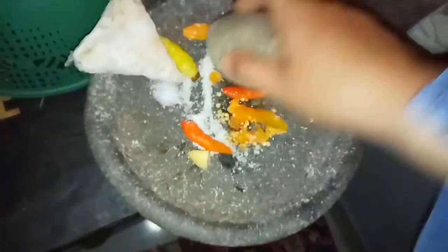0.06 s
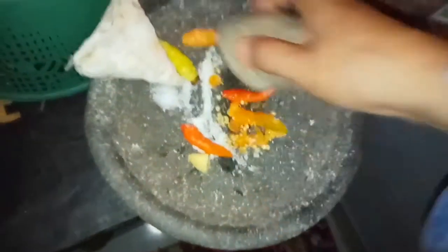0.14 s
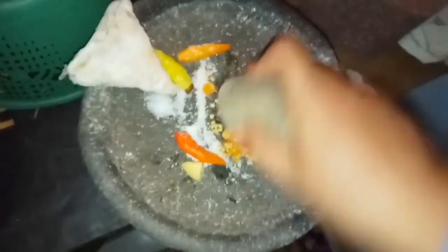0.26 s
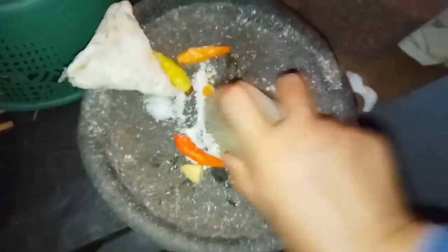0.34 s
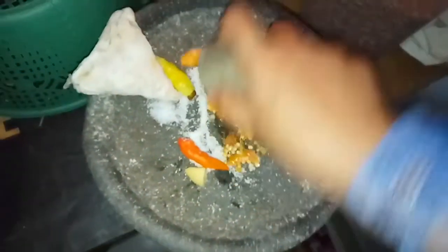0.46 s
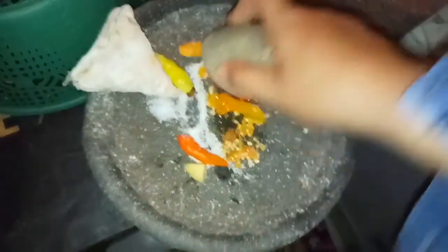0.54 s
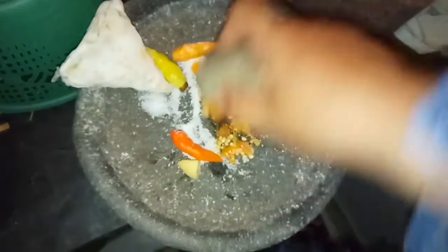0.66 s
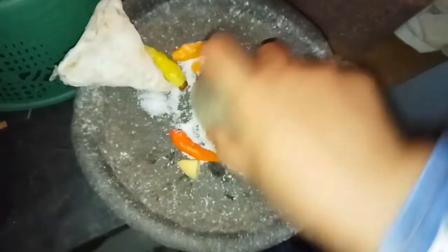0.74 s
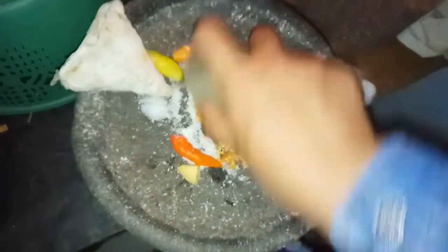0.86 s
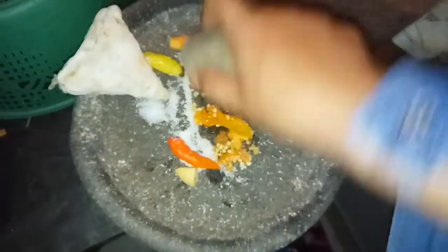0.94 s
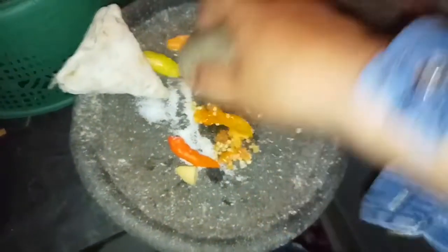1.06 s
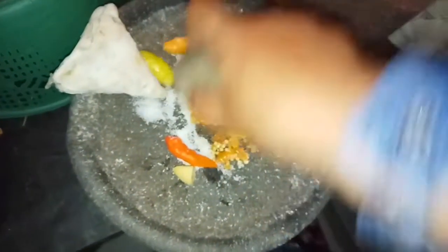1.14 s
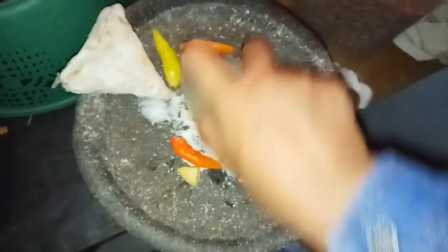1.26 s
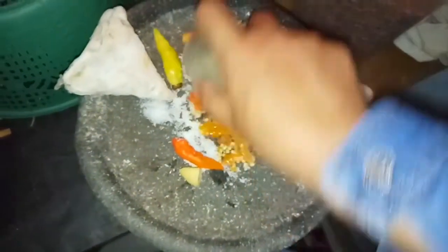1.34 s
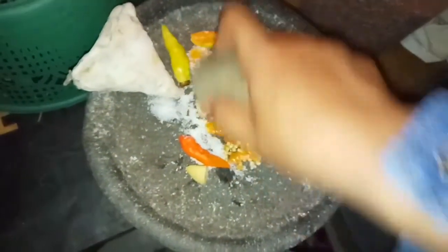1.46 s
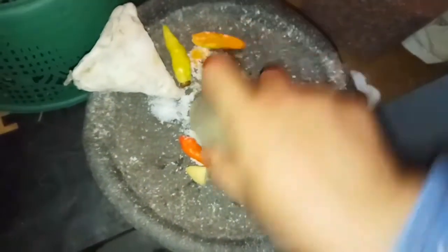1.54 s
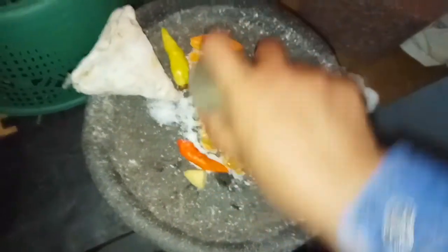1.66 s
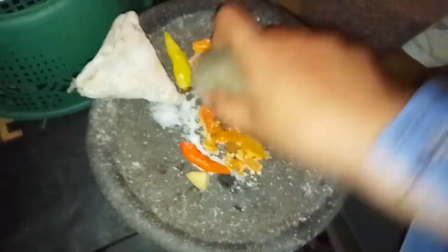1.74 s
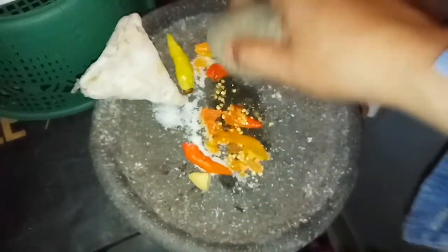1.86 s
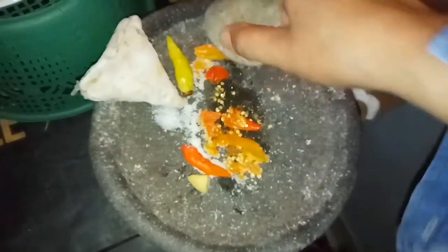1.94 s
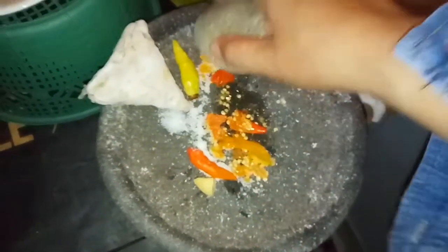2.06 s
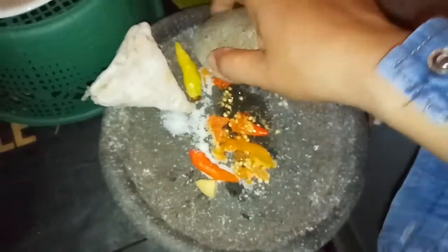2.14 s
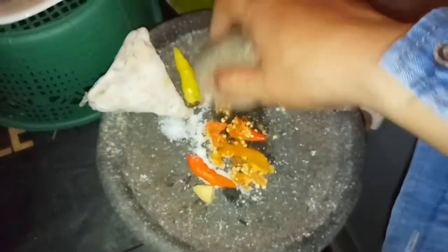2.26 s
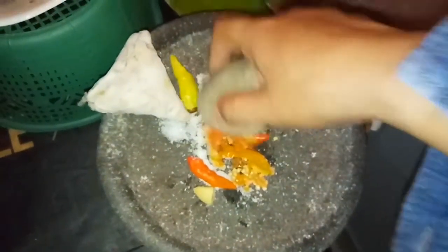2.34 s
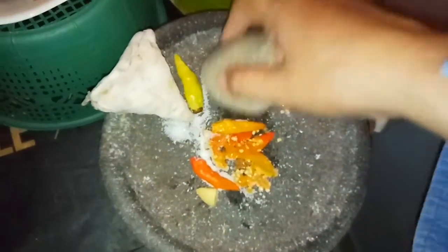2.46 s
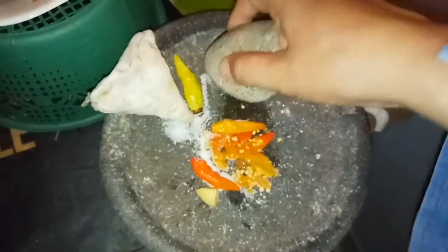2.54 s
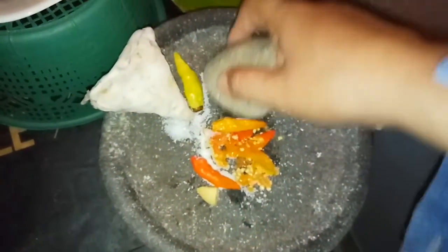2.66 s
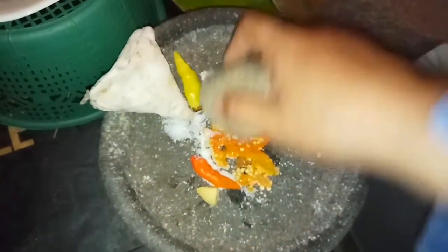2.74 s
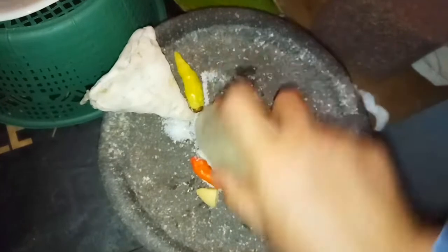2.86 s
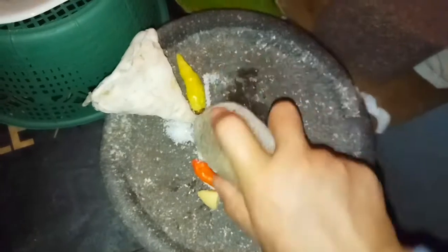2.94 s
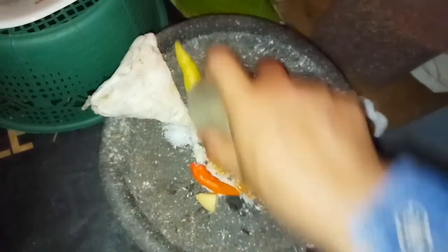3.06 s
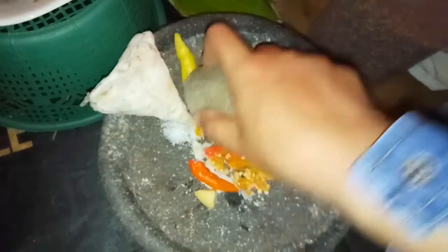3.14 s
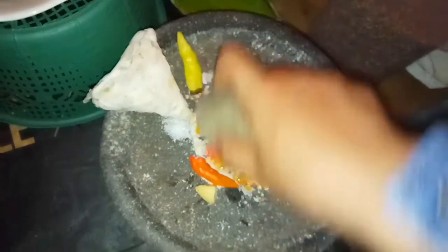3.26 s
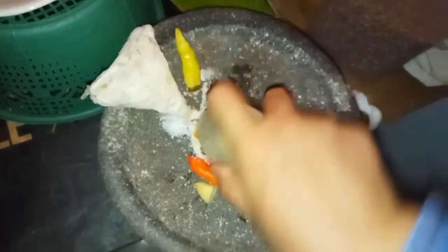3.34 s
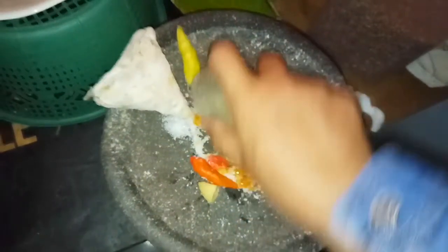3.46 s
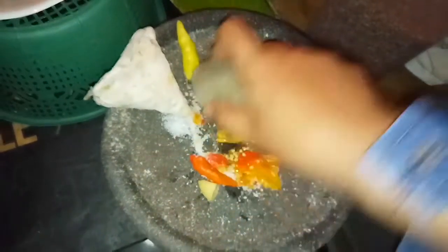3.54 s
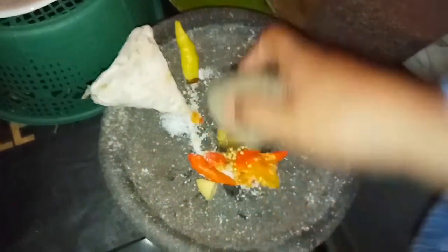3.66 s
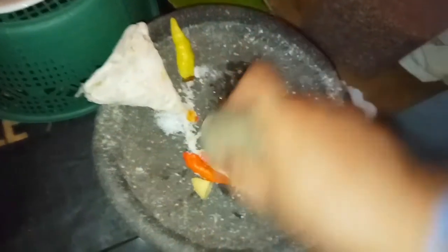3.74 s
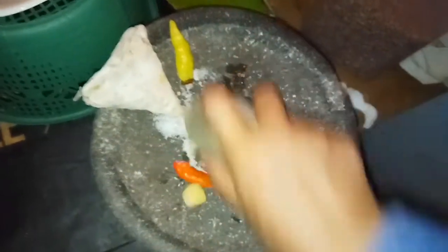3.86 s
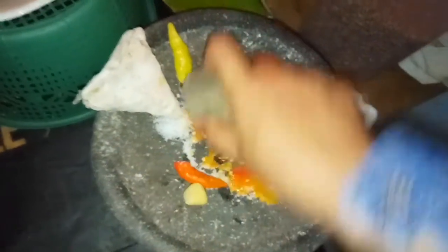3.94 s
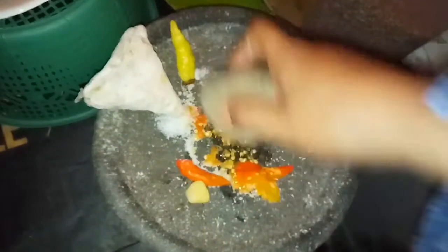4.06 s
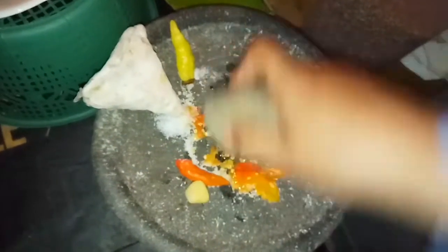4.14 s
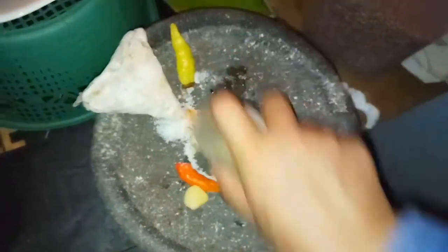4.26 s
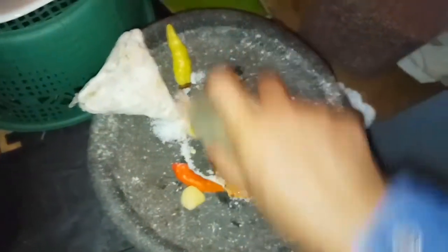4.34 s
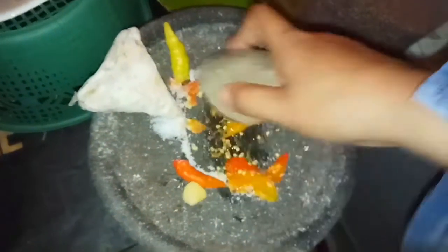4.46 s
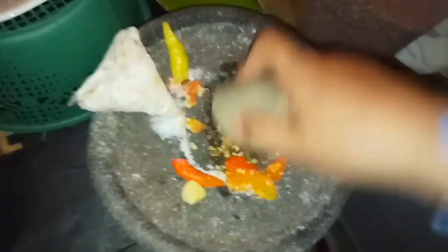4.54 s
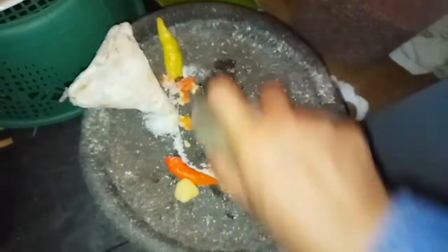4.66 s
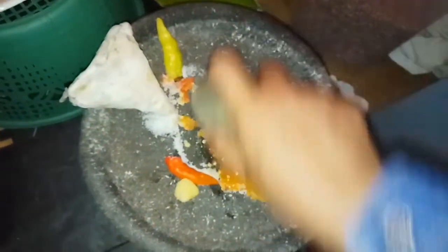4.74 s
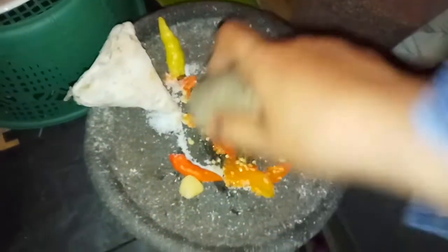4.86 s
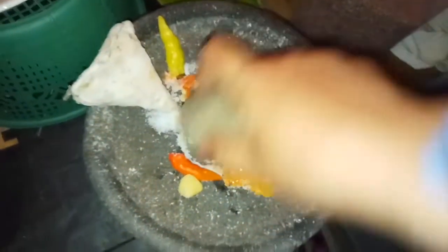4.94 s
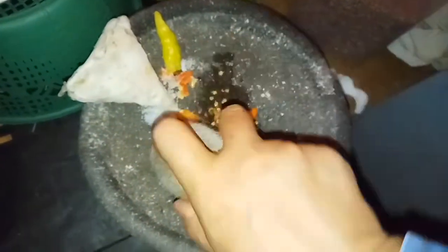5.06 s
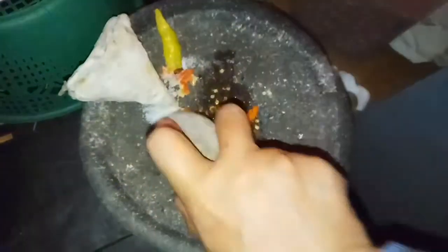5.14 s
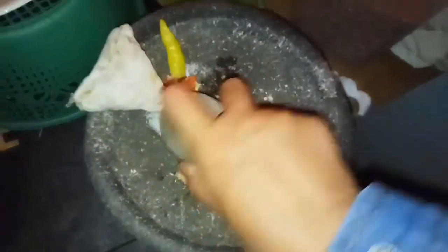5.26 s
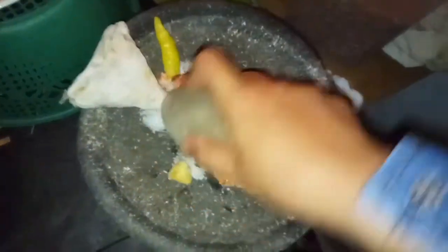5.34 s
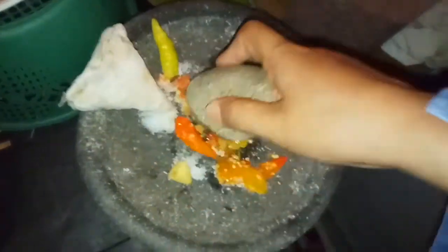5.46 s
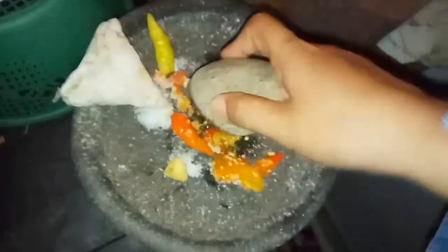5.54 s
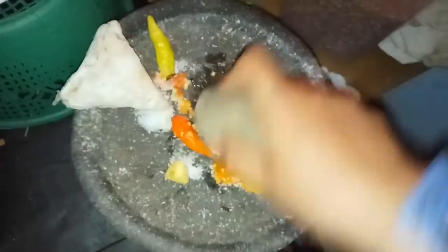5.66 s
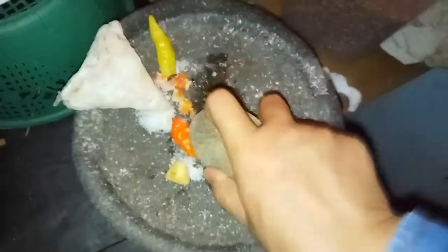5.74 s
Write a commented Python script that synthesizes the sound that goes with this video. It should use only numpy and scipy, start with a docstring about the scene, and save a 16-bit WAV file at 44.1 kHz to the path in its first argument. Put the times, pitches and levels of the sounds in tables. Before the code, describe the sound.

A close, mono, mostly dry sound in a small kitchen, with very quiet low air of the house beneath. At once a stone pestle grinds salt and chillies on a flat stone mortar. From 0 to 1.7 s short uneven strokes follow each other several times a second: bright, sandy crunches, sharp crystal snaps thickest near 0.3 s, dull hollow stone rumbles, a harder knock at 0.5 s, soft low table thuds. A pause follows, with two very faint bird chirps at 1.8 and 2.0 s; strokes return at 2.1 to 2.4 s, and a clearer falling chirp comes at 2.5 s. From 2.8 s grinding resumes, crackling strongly at 3.0 s, then in spaced strokes. Around 4.1 s bare stone rubs and knocks in a cluster, again at 4.5 s. At 5.25 s comes the heaviest crunch, with a loud snap and table thud. Sparse, small gritty strokes end near 5.8 s.

```python
"""A phone lies close to a flat stone mortar in a kitchen, over the near-steady air of the house.
At once a stone pestle sets to grinding salt and chillies, stroke after stroke to the end: crystals
crackle as bursts of coloured noise, bare stone rumbles and rings through resonant modes of the
mortar, and the table thuds under many of the pushes. Before the middle a small bird further off
chirps three times, as falling sine whistles. The room answers both mortar and bird."""
import sys
import numpy as np
from scipy import signal
from scipy.fft import rfft, irfft, next_fast_len
from scipy.io import wavfile
from scipy.ndimage import uniform_filter1d, map_coordinates

SR = 44100
rng = np.random.default_rng(int(sys.argv[2]) if len(sys.argv) > 2 else 0)


def wav_out(sig):
    """Save sig, one row per channel (or a flat mono array), as 16-bit PCM at SR to the path in sys.argv[1]."""
    wavfile.write(sys.argv[1], SR, np.round(np.clip(np.atleast_2d(sig).T, -1, 1) * 32767).astype(np.int16))


N = 255780

# Strokes that crush crystals. Each row: start in seconds, length in seconds, level of the fine grit
# at the start in dB and at the end in dB, coarse grit and finest dust in dB relative to the fine.
CRUSH_STROKES = [(0.003, 0.018, -32.5, -44, -10.5, -2.5), (0.147, 0.06, -55, -57, 8.5, 1),
                 (0.247, 0.017, -42, -34, -2, -8.5), (0.329, 0.108, -41.5, -27, -10, -3.5),
                 (0.552, 0.32, -60, -56.5, 3, 0.5), (0.7, 0.029, -32.5, -33, -12, -5.5),
                 (0.825, 0.091, -36, -33, -13.0, -3.5), (0.955, 0.025, -63.5, -48.5, -2.5, -2),
                 (1.071, 0.087, -56, -37.5, -12.5, -1), (1.283, 0.089, -29.0, -36.5, -12, -2),
                 (1.47, 0.039, -35, -54, -9, -1.5), (1.523, 0.02, -35.5, -34, -13.5, 1.5),
                 (1.634, 0.051, -31, -31, -13.5, -2), (2.144, 0.024, -46, -55, -3, -5),
                 (2.229, 0.1, -38, -27, -5, -1.5), (2.793, 0.1, -47.5, -58.5, 5.5, -2),
                 (2.897, 0.043, -52.5, -42.5, -9.5, -0.5), (2.975, 0.13, -39.5, -36.5, -9, 0),
                 (3.228, 0.096, -52, -40.5, 0.5, 0), (3.427, 0.03, -37.5, -32.5, -8, -2.5),
                 (3.597, 0.07, -67, -59.5, 5.5, 4), (3.709, 0.053, -48, -46, -2.5, -5),
                 (3.817, 0.09, -31.5, -34.5, -7.5, -3.5), (3.907, 0.03, -56.0, -34.5, -11.0, -2.5),
                 (4.09, 0.12, -50.5, -47, -2.5, -0.5), (4.213, 0.16, -57.5, -31.5, -11, -3.5),
                 (4.496, 0.13, -45.5, -37, -8.5, -4), (4.697, 0.008, -33.5, -30.5, -14.5, -6.5),
                 (4.761, 0.034, -29, -42, -10.5, 0), (4.864, 0.035, -45.5, -60, -1.5, -13),
                 (5.077, 0.025, -55, -55, -4, 2), (5.16, 0.053, -75, -52.5, 6, 5),
                 (5.249, 0.079, -25, -56.5, -7.5, -3.5), (5.324, 0.088, -46, -51, -5, -0.5),
                 (5.687, 0.007, -49, -51.5, -9.5, 0.5), (5.778, 0.0051, -33, -41, -12.5, -2.5)]
# Single crystals that snap at set moments, loud and faint. Each row: time in seconds, peak of the
# bright part in dB, peak of the dull part in dB relative to it.
SET_SNAPS = [(0.1019, -35, -17.5), (0.2334, -28, -19.5), (0.2584, -34, -16), (0.2778, -19, -18),
             (0.3027, -16.5, -22), (0.3226, -11, -11.5), (0.3338, -9.5, -18.5), (0.5769, -37.5, -18),
             (0.7184, -18, -20), (0.7794, -37, -22), (0.846, -22, -16), (0.8854, -17, -16.5),
             (0.9467, -14, -10.5), (1.1987, -24, -13), (1.283, -17, -17.5), (1.5135, -19, -23.5),
             (1.6127, -26, -19), (1.6453, -21, -15), (1.6811, -19.5, -22.5), (2.1339, -27, -5.5),
             (2.227, -20.5, -15), (2.2812, -14, -5), (2.3017, -18, -21), (2.3589, -18, -8.5),
             (2.7984, -22, -15), (2.825, -36, -17), (2.8575, -36, -12.5), (2.8948, -30, -25),
             (2.9305, -22, -10.5), (2.9696, -21, -13.5), (3.0087, -8, -13.5), (3.0199, -11, -13.5),
             (3.0854, -33, -6), (3.1113, -17.5, -10), (3.4245, -15.5, -23), (3.7044, -29.5, -4),
             (3.7594, -22, -29), (3.7803, -23.5, -16), (3.8429, -17.5, -4.5), (4.2188, -21, -24),
             (4.2398, -18, -26), (4.357, -12, -13.5), (4.607, -38, -29), (4.6466, -21, -17),
             (4.6939, -23.5, -23), (4.7371, -20, -11), (4.8633, -25, -24.5), (5.0664, -20, -13.5),
             (5.2577, -7, -13.5), (5.682, -21.5, -19), (5.7678, -26.5, -3)]
# Colours of fine grit, finest dust and coarse grit. Each row: frequency in Hz, relative gain in dB.
FINE_COLOUR = [(2500, -36), (3500, -11.5), (4300, -9.5), (5200, -2.5), (5920, -0.5), (6790, -0.5),
               (7600, -4), (8400, -20.5), (11000, -36.5)]
DUST_COLOUR = [(6000, -27), (7800, -11.5), (8800, 0.5), (9500, -0.5), (11000, -7), (12100, -12.5),
               (14800, -14), (15700, -17.5), (16100, -48)]
COARSE_COLOUR = [(300, -16), (800, -11), (1500, -1.5), (2500, 5), (3500, 4), (4500, -15), (7000, -40)]
# Strokes of stone sliding on stone. Each row: start in seconds, length in seconds, rumble at the
# start in dB and at the end in dB, hardness of the contact (ringing over rumble) in dB.
SLIDE_STROKES = [(0.039, 0.046, -34, -40, -14.0), (0.156, 0.092, -34.0, -35, -8.0),
                 (0.399, 0.077, -36.5, -70, -3), (0.52, 0.035, -31.5, -44, -16),
                 (0.612, 0.068, -35.0, -27.5, -14), (0.795, 0.16, -63.5, -40, -6),
                 (1.098, 0.0077, -42, -36.5, -8), (1.108, 0.0085, -27, -37.5, -18),
                 (1.278, 0.071, -53.5, -45.5, 1.5), (1.426, 0.038, -32.5, -28.0, -15),
                 (1.566, 0.14, -59, -46, -9.5), (1.789, 0.007, -59.5, -51, -9.5),
                 (2.135, 0.0082, -60.5, -72.5, -2.0), (2.255, 0.096, -46, -46, -4.5),
                 (2.786, 0.15, -61.5, -66.5, -0.5), (2.972, 0.112, -58.5, -60, 2.5),
                 (3.118, 0.042, -45, -57.5, -3.5), (3.226, 0.068, -44, -35, -5.5),
                 (3.456, 0.033, -38.5, -33.5, -7), (3.607, 0.16, -48, -63, -2.0),
                 (3.841, 0.053, -36, -46, -5), (3.94, 0.0051, -49.5, -37, -2.0),
                 (4.087, 0.071, -32.5, -34, -8.0), (4.243, 0.208, -50.5, -55.5, -4.5),
                 (4.497, 0.045, -29.5, -28, -9.5), (4.647, 0.14, -64, -47, -2.0),
                 (4.838, 0.033, -81, -48.5, 1.5), (5.069, 0.027, -63.5, -59, 5),
                 (5.236, 0.074, -40.5, -32.5, -10), (5.361, 0.07, -68, -59.5, 1),
                 (5.684, 0.0274, -65.5, -61, -0.5), (5.777, 0.019, -62, -65, 9)]
# The pestle knocks the bowl. Each row: time in seconds, blow in dB before the gains of the two
# sets of modes, hardness (blow to the high modes over the blow to the low) in dB.
BOWL_KNOCKS = [(0.028, -13, 15), (0.1618, -30, 0), (0.194, -20.5, 2.5), (0.2083, -28, 9.5),
               (0.511, -9.5, 3.5), (0.609, -26, 1), (0.6443, -18.5, -3), (1.0868, -23, -6),
               (1.1071, -18.5, -14), (1.4545, -14.5, -18), (1.4719, -22.5, -8), (1.795, -39, -16),
               (2.267, -28, -5.5), (3.6403, -31, -1), (3.8431, -19.5, -7), (4.0969, -19.5, -14),
               (4.105, -17, -2.5), (4.1422, -17, -22), (4.1478, -15.5, -12), (4.1612, -19.5, -8),
               (4.501, -22.5, -4), (4.5153, -20, -11), (4.8666, -31, -9), (5.261, -17.5, -3.5),
               (5.2858, -22, -7.5)]
# Low, damped modes of the mortar on its table. Each row: frequency in Hz, width in Hz, relative
# level in dB before the contact and the radiation shape it.
BOWL_MODES = [(306, 39, -0.5), (408, 44, 5), (547, 220, 3.5), (892, 220, 0.5), (800, 1200, 1.5),
              (1074, 59, -15), (1490, 170, -20.5)]
# High ringing modes of the stone. Each row: frequency in Hz, width in Hz, relative level in dB,
# before the contact of a knock softens them or a slide sharpens them.
RING_MODES = [(2067, 42, 7), (2580, 740, -4.5), (3633, 470, 4), (3700, 150, -8.5), (6360, 300, 5),
              (7100, 210, -12), (8850, 930, -15.5), (11000, 480, -24.5)]
# Pushes of the hand into the table. Each row: start in seconds, length in seconds, level in dB.
TABLE_PUSHES = [(0.039, 0.024, -39.5), (0.204, 0.036, -44.5), (0.421, 0.015, -40.5), (0.519, 0.021, -41),
                (0.707, 0.034, -38.5), (0.926, 0.031, -41), (1.136, 0.1, -54.5), (1.336, 0.032, -42),
                (1.528, 0.035, -42.5), (2.33, 0.04, -53.5), (3.088, 0.091, -51), (3.275, 0.1, -51),
                (3.472, 0.065, -45), (3.862, 0.14, -47.5), (4.326, 0.151, -47), (4.634, 0.041, -53),
                (4.737, 0.031, -52.5), (4.975, 0.046, -53), (5.276, 0.029, -29.5), (5.717, 0.016, -55)]
# Modes of the table. Each row: frequency in Hz, width in Hz, relative level in dB before the
# push and the radiation shape it.
TABLE_MODES = [(70, 11, -18.5), (93, 11, -6), (115.5, 14, 2.5), (153, 38, -6)]
# Bird chirps. Each row: start in seconds, length in seconds, first pitch in Hz, last pitch in Hz,
# level in dB before its fade, roughness and distance.
BIRD_CHIRPS = [(1.80, 0.08, 5400, 5150, -62), (1.99, 0.06, 6200, 5300, -63), (2.481, .06, 7140, 4500, -43)]
# Decay of the kitchen. Each row: frequency in Hz, time to fall 60 dB in seconds.
KITCHEN_DECAY = [(200, 0.63), (2000, 0.1), (6000, 0.35), (14000, 0.3)]
# Colour of the air in the house. Each row: frequency in Hz, relative gain in dB.
AIR_COLOUR = [(20, -33), (45, -23.5), (64, -3.5), (82, -1), (105, -10.5), (170, -5.5), (245, -32),
              (300, -21.5), (400, -28), (900, -33), (4200, -43.5), (5600, -49.5), (7000, -47), (15600, -66)]

CRUSH_RISE_DB_PER_S, CRUSH_FALL_DB_PER_S = 420.5, 269.5
SLIDE_RISE_DB_PER_S, SLIDE_FALL_DB_PER_S = 619.5, 300.5
PUSH_RISE_DB_PER_S, PUSH_FALL_DB_PER_S = 399, 299.5
ONSET_S = 0.03  # the swell-in is twice as steep this long before a stroke's start
GRIT_PATCH_DB = 2.4  # how far the colour of the grit varies
# further snaps: rate, least peak over the grit, mean excess above that, dull part over bright
LOOSE_PER_S, LOOSE_DB, LOOSE_SPREAD_DB, LOOSE_DULL_DB = 20, 5, 2.5, -14.5
BIRD_DIRECT_DB, MORTAR_TO_ROOM_DB = -5, -15.0
AIR_DB = -60
TOP_HZ = 16650  # upper limit of the sound


def crush():
    """Crystals break in clumps under the pestle; big ones sound lower."""
    clumps = amp(1.5 * wobble(40))
    small = bursts(350, spread_db=0.5, life_s=0.0014, bed=0.79) * clumps
    small = speckled(small, depth_db=GRIT_PATCH_DB, size=10)
    large = bursts(270, spread_db=2.5, life_s=0.0012, bed=0.7) * clumps
    large = speckled(large, depth_db=GRIT_PATCH_DB, size=10)
    fine = unit(filtered(small, colour(FINE_COLOUR)))
    dust = unit(filtered(small, colour(DUST_COLOUR)))
    coarse = unit(filtered(large, colour(COARSE_COLOUR)))
    dust_gain = grit(shifted(CRUSH_STROKES, column=5))
    coarse_gain = grit(shifted(CRUSH_STROKES, column=4))
    return grit(CRUSH_STROKES) * fine + dust_gain * dust + coarse_gain * coarse


def grit(rows):
    """Gain of crushing strokes."""
    return strokes([r[:4] for r in rows], CRUSH_RISE_DB_PER_S, CRUSH_FALL_DB_PER_S)


def snaps():
    """Each snap is a burst of a few milliseconds with a little debris after it."""
    out = np.zeros(N + SR)
    t = np.arange(SR // 20) / SR
    click = np.arange(N) == 0
    edge = filtered(click, lambda f: colour(FINE_COLOUR)(f) + amp(-1.5) * colour(DUST_COLOUR)(f))[:len(t)]
    body = filtered(click, colour(COARSE_COLOUR))[:len(t)]
    for s, db, dull_db in list(SET_SNAPS) + loose():
        # each part falls 60 dB in the seconds that divide t
        crack = amp(-60 * t / 0.0091)
        debris = amp(-18.0 - 60 * t / 0.047)
        burst = (crack + debris) * rng.standard_normal(len(t))
        bright = signal.fftconvolve(burst, edge)[:len(t)]
        dull = signal.fftconvolve(burst, body)[:len(t)]
        snap = bright / np.abs(bright).max() + amp(dull_db) * dull / np.abs(dull).max()
        out[round(s * SR):][:len(t)] += amp(db) * snap
    return out[:N]


def loose():
    """Further snaps at random moments follow the strength of the grit around them."""
    draw = rng.random((int(LOOSE_PER_S * N / SR), 2))
    at = (draw[:, 0] * N).astype(int)
    grit_db = 20 * np.log10(grit(CRUSH_STROKES)[at] + 1e-9)
    db = grit_db + LOOSE_DB - LOOSE_SPREAD_DB * np.log(draw[:, 1])
    return [(i / SR, level, LOOSE_DULL_DB) for i, level in zip(at, db)]


def slide():
    """Slips and small bumps of the rough stone shake the bowl; hard contact also wakes the high modes."""
    rub = strokes([r[:4] for r in SLIDE_STROKES], SLIDE_RISE_DB_PER_S, SLIDE_FALL_DB_PER_S)
    hard = strokes(shifted(SLIDE_STROKES, column=4), SLIDE_RISE_DB_PER_S, SLIDE_FALL_DB_PER_S)
    bumps = speckled(rng.standard_normal(N), depth_db=1.5, size=30)
    rumble = unit(bowl(slips(200, scatter=0.3, spread_db=5.0) + 1.3 * unit(bumps)))

    def sharpened(f):
        response = modes(RING_MODES)(f)
        return response * abs(response) ** 0.48

    scrape = bursts(250, spread_db=5.5, life_s=0.0019, bed=0.23)
    ring = unit(filtered(scrape, sharpened))
    return rub * rumble + hard * ring


def slips(rate, scatter, spread_db):
    """The pestle sticks and lets go at an uneven rate; slips jerk the bowl one way, unequally hard."""
    count = np.cumsum(rate * amp(2.5 * wobble(20))) / SR + scatter * wobble(rate)
    moments = np.diff(np.floor(np.maximum.accumulate(count)), prepend=0) > 0
    return unit(-amp(spread_db * rng.standard_normal(N)) * moments)


def knocks():
    """A blunt blow into both sets of modes."""
    blows, hard = np.zeros(N), np.zeros(N)
    for s, db, hard_db in BOWL_KNOCKS:
        blows[round(s * SR)] = -amp(db)
        hard[round(s * SR)] = -amp(db + hard_db)
    ring = filtered(hard, lambda f: soft(2000)(f) ** 2 * modes(RING_MODES)(f))
    return amp(19) * bowl(blows) + amp(28.5) * ring


def bowl(pushes):
    """The low modes of the mortar, driven through a blunt contact."""
    return filtered(pushes, lambda f: soft(1850)(f) * modes(BOWL_MODES)(f) * stiff(265)(f) ** 2)


def table():
    """The table top booms under the shifting weight."""
    rows = [(s, length, db, db) for s, length, db in TABLE_PUSHES]
    push = strokes(rows, PUSH_RISE_DB_PER_S, PUSH_FALL_DB_PER_S)
    shake = rng.standard_normal(N) * amp(0.74 * wobble(10))
    return push * unit(filtered(shake, lambda f: modes(TABLE_MODES)(f) * stiff(58)(f) * soft(190)(f)))


def bird():
    """Short falling whistles, each loudest early on, slightly rough."""
    out = np.zeros(N)
    phase = 2 * np.pi * 3900 * np.arange(N) / SR
    roughness = 1 + amp(-11) * np.cos(phase) + amp(-24) * np.cos(2 * phase)
    for s, length, start_hz, end_hz, db in BIRD_CHIRPS:
        u = np.arange(round(length * SR)) / (length * SR)  # progress from 0 to 1
        pitch = start_hz + (end_hz - start_hz) * u
        swell = np.sin(np.pi * u ** 0.55) * amp(-10 * u)
        whistle = np.sin(2 * np.pi * np.cumsum(pitch) / SR)
        out[round(s * SR):][:len(u)] = amp(db) * swell * whistle
    return out * amp(3.5 * wobble(200)) * roughness


def kitchen(x):
    """Each frequency of the room's answer dies at its own speed."""
    hz, t, z = signal.stft(rng.standard_normal(SR // 2), SR, nperseg=256)
    decay = amp(-60 * t / along(KITCHEN_DECAY, hz)[:, None])
    tail = signal.istft(z * decay, SR, nperseg=256)[1]
    late = np.pad(x, (250, 0))  # the answer starts 250 samples late
    return signal.fftconvolve(late, tail / np.linalg.norm(tail))[:N]


def air():
    """The near-steady background of the house is coloured noise, its level drifting slightly."""
    return amp(AIR_DB + 0.9 * wobble(1.6)) * unit(filtered(rng.standard_normal(N), colour(AIR_COLOUR)))


def amp(db):
    """Decibels to gain."""
    return 10 ** (np.asarray(db) / 20)


def unit(x):
    """Scaled to rms 1."""
    return x / np.sqrt(np.mean(x ** 2) + 1e-20)


def along(points, hz):
    """Values at hz, read between (Hz, value) points on a log axis."""
    f, v = np.transpose(points)
    return np.interp(np.log(hz + 1), np.log(f + 1), v)


def wobble(rate):
    """A smooth random curve, rate knots a second."""
    knots = rng.standard_normal(int(N * rate / SR) + 4)
    return map_coordinates(knots, [np.arange(N) * rate / SR])


def filtered(x, response):
    """x times a complex response of frequency."""
    m = next_fast_len(N + SR // 2)
    return irfft(rfft(x, m) * response(np.fft.rfftfreq(m, 1 / SR)), m)[..., :N]


def colour(points):
    """Causal response with the gain of the (Hz, dB) points."""
    def response(hz):
        # folding the cepstrum forward in time gives minimum phase
        cepstrum = irfft(np.log(amp(along(points, hz)) + 1e-6))
        cepstrum[1:len(hz) - 1] *= 2
        cepstrum[len(hz):] = 0
        return np.exp(rfft(cepstrum))
    return response


def modes(rows):
    """Causal sum of resonances, all pushed the same way."""
    return lambda f: sum(amp(db) * 1j * f * w / (c * c - f * f + 1j * f * w) for c, w, db in rows)


def soft(hz):
    """A blunt contact lasts longer, so its push holds nothing far above hz."""
    return lambda f: 1 / (1 - (f / hz) ** 2 + 1.5j * f / hz) ** 2


def stiff(hz):
    """A small body radiates little below hz."""
    return lambda f: 1 / (1 - (hz / (f + 1)) ** 2 - 1.2j * hz / (f + 1))


def speckled(x, depth_db, size):
    """Each contact has its own colour: a random gain in patches of frequency, size short frames long."""
    z = signal.stft(x, nperseg=256)[2]
    field = uniform_filter1d(rng.standard_normal(z.shape), size=2, axis=0)
    field = uniform_filter1d(field, size=size, axis=1)
    return signal.istft(z * amp(depth_db * unit(field)), nperseg=256)[1][:N]


def bursts(rate, spread_db, life_s, bed):
    """Noise that jumps up about rate times a second, its power dying with life_s, over a steady bed."""
    strength = amp(spread_db * np.minimum(rng.exponential(size=N), 2.8)) ** 2
    starts = (rng.random(N) < rate / SR) * strength
    power = signal.lfilter([1], [1, -np.exp(-1 / (life_s * SR))], starts)
    return np.sqrt(power / power.mean() + bed) * rng.standard_normal(N)


def strokes(rows, rise_db_per_s, fall_db_per_s):
    """Gain of a layer: each row swells in, ramps from first level to last and dies away; powers add."""
    t = np.arange(0, N, 32) / SR
    start, length, first_db, last_db = np.transpose(rows)[..., None]
    ramp = amp(first_db) + (amp(last_db) - amp(first_db)) * np.clip((t - start) / length, 0, 1)
    ahead = np.maximum(start - t, 0)
    after = np.maximum(t - start - length, 0)
    edges = amp(-rise_db_per_s * ahead * (1 + ahead / ONSET_S / 2) - fall_db_per_s * after)
    gain = np.sqrt(np.sum((ramp * edges) ** 2, axis=0))
    return np.interp(np.arange(N) / SR, t, gain)


def shifted(rows, column):
    """The strokes with both levels moved by the dB in one of their columns."""
    return [(r[0], r[1], r[2] + r[column], r[3] + r[column]) for r in rows]


def scene():
    """One microphone close to the mortar feeds both channels."""
    mortar = crush() + snaps() + slide() + knocks()
    far = bird()
    direct = mortar + table() + amp(BIRD_DIRECT_DB) * far
    mono = direct + kitchen(amp(MORTAR_TO_ROOM_DB) * mortar + far) + air()
    return np.array([mono, mono])


def record(dry):
    """Nothing is kept above the upper limit."""
    return filtered(dry, lambda hz: hz < TOP_HZ)


dry = scene()
out = record(dry)
wav_out(out)
```